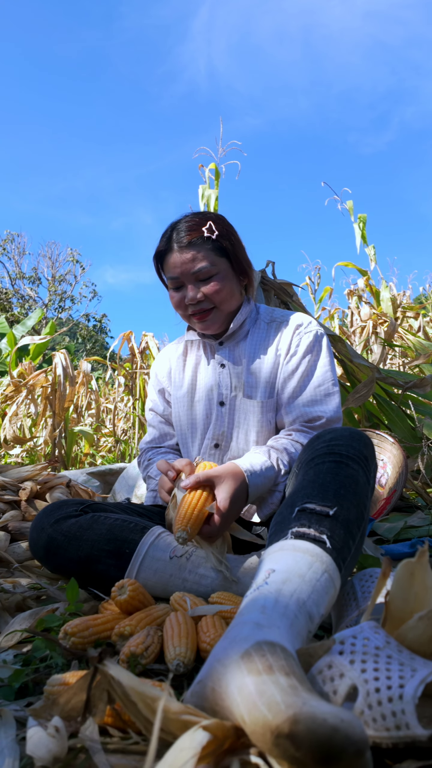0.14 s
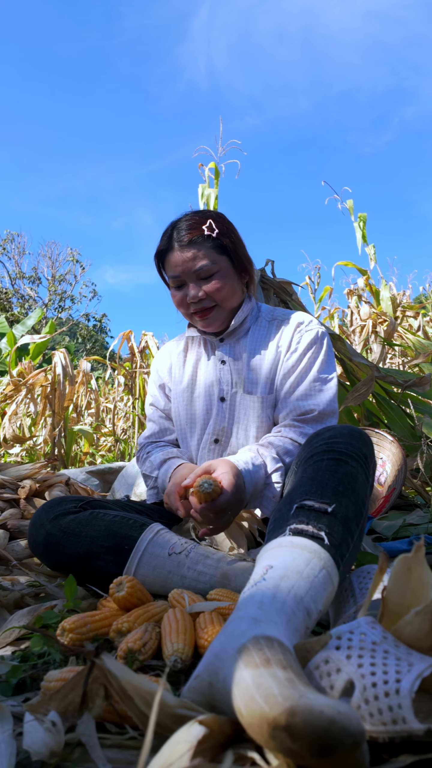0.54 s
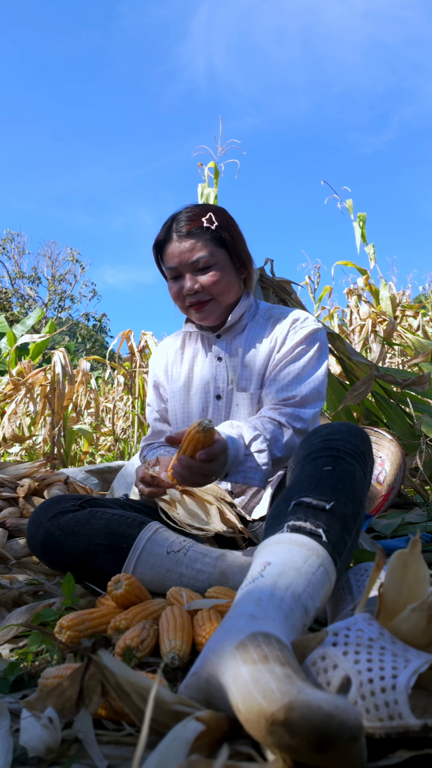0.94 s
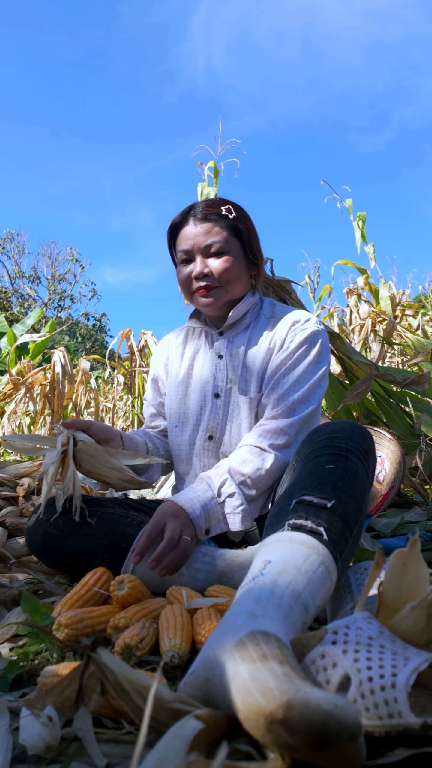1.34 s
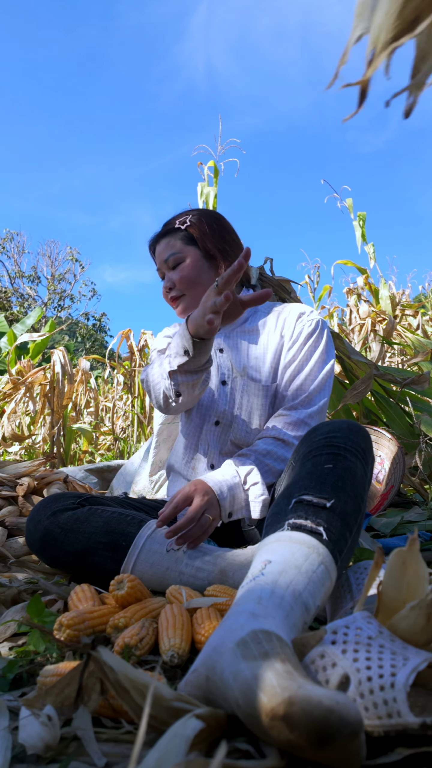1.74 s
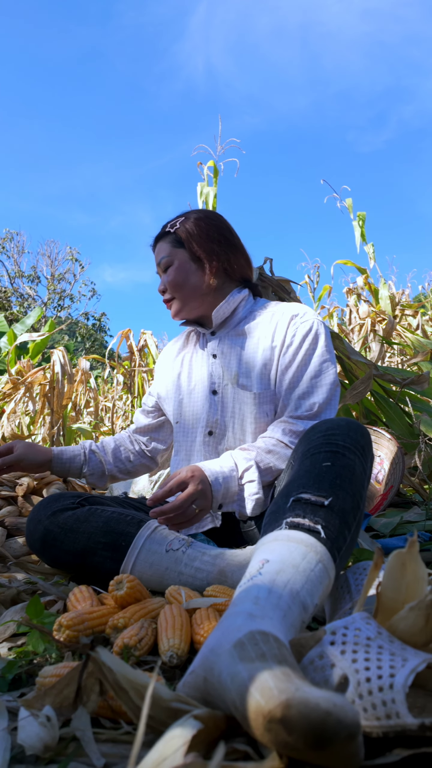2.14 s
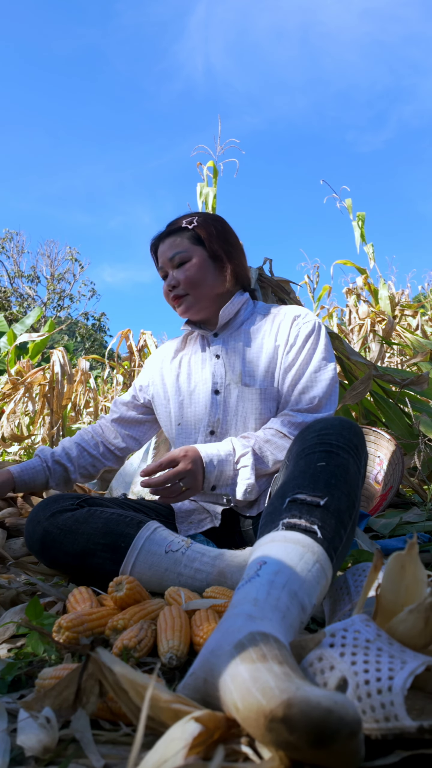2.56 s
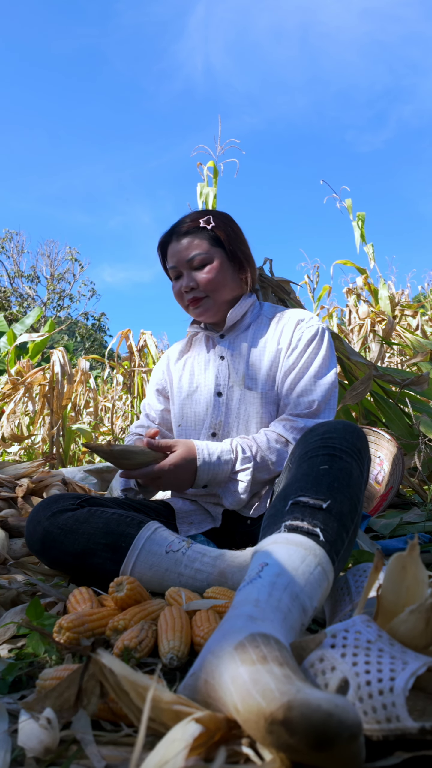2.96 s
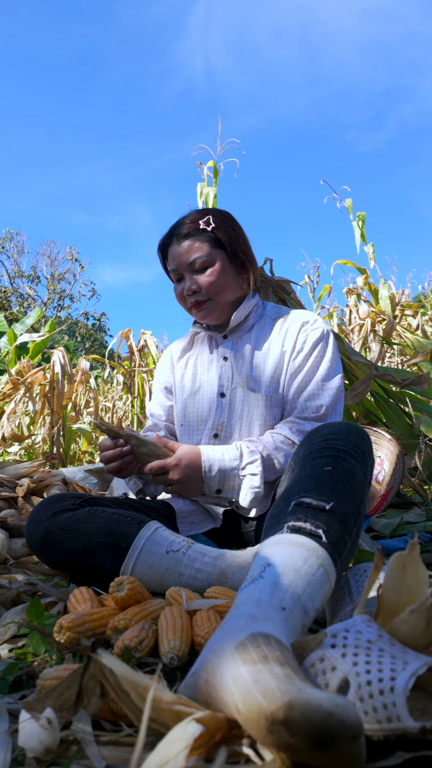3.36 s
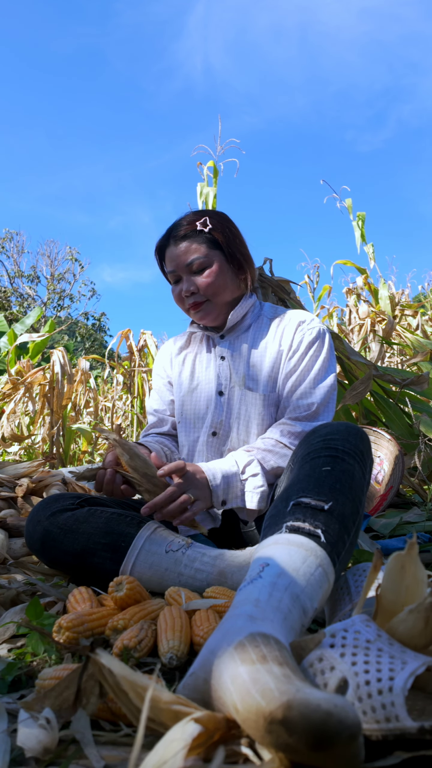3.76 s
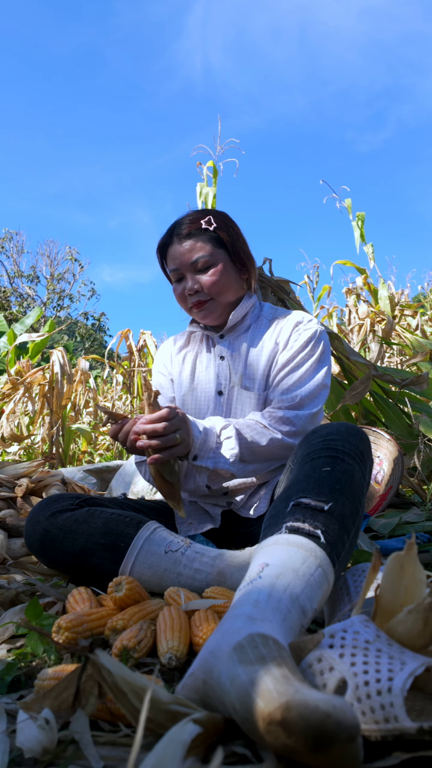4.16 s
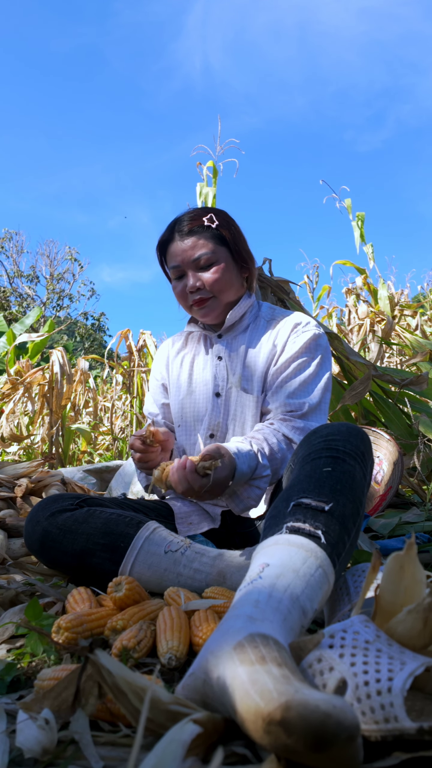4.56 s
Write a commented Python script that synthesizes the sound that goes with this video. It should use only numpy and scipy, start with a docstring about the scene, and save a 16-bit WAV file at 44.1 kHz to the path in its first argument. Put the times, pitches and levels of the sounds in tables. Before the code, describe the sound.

Outdoors in a quiet field, brittle leaves rustle and tear in uneven bursts near a pair of microphones. Soft low bumps and tiny squeaky rubs accompany the handling. A discarded husk swishes down at right around two seconds; light fumbling follows, then a hard snap and renewed ripping. A fast, regular cricket chirps faintly at right, another trills softly to the left.

```python
"""Dry husks are twisted and torn off corn ears by hand, a little left of a pair of microphones.
The leaves rustle as filtered noise driven by dense random creases; snapping fibres are resonant noise
bursts over damped modes of the ear. A husk lands on a pile at the right. Rubs, a short knock and soft
bumps throughout add wavering tones and damped sines. Behind them two crickets sing as shaped tones and
throbbing narrow-band noise, over a far low rumble and a faint hiss made of random spectra."""
import sys
import numpy as np
from scipy import signal
from scipy.fft import rfft, irfft
from scipy.io import wavfile
from scipy.ndimage import uniform_filter1d

SR = 44100
rng = np.random.default_rng(int(sys.argv[2]) if len(sys.argv) > 2 else 0)


def boost(x):
    """Linear amplitude factor 10**(x/20) for a level x in decibels (scalar or array-like)."""
    u = np.asarray(x, float) / 20
    return 10 ** u


def put_to_file(sound):
    """Save the sound as 16-bit audio at rate SR, in the file named by the first command-line argument."""
    columns = np.atleast_2d(sound).T  # one column per channel
    safe = np.clip(columns, -1, 1)
    whole_steps = np.round(safe * 32767)
    wavfile.write(sys.argv[1], SR, whole_steps.astype(np.int16))


N = 207490

# Pulls, twists and slides of the leaves: start_s, length_s, first_level_db, last_level_db,
# treble_db (relative)
PULLS = [(0, 0.13, -48.5, -55, -5.5), (0.111, 0.039, -45, -49.5, -6.5), (0.199, .015, -44, -59, -8),
         (0.302, 0.14, -49.5, -60.5, -4.5), (0.436, 0.046, -53.5, -54, -6), (0.483, .19, -52.5, -50, -4.5),
         (0.674, 0.096, -51, -52, -5), (0.808, 0.062, -51.5, -60, -9), (0.854, .113, -41, -53, -4),
         (.89, 0.047, -43.5, -47, -8.5), (.985, 0.08, -56, -60, -2.5), (1.16, 0.041, -58, -59.5, -4),
         (1.231, 0.063, -58.5, -54, -4), (1.301, 0.047, -46, -54, -5.5), (1.35, 0.073, -40.5, -56, -4),
         (1.572, 0.087, -50.5, -62.5, -9), (1.684, 0.051, -60.5, -52.5, -4.5), (1.735, 0.078, -53, -69, -5),
         (1.874, .04, -65, -69, -2), (2.022, 0.033, -35, -34.5, -4.5), (2.059, 0.041, -43, -32.5, -4.5),
         (2.097, .018, -35.5, -40, -3), (2.116, 0.046, -32, -40, -6.5), (2.161, 0.089, -42, -41, -5),
         (2.249, 0.058, -44.5, -49, -5.5), (2.31, 0.071, -50.5, -63.5, -9), (2.388, 0.075, -58.5, -50, -7),
         (2.468, .09, -51, -62.5, -3), (2.664, 0.027, -62, -57, 7.5), (2.693, 0.066, -56, -63.5, 12),
         (3.02, 0.12, -61, -71, -3.5), (3.159, 0.046, -59.5, -72, -7), (3.343, 0.04, -64.5, -68, 0),
         (3.416, .05, -59.5, -67, -1), (3.553, 0.072, -69, -66, 0), (3.603, 0.019, -51.5, -65, 3),
         (3.64, 0.023, -59, -39, -1.5), (3.666, 0.033, -23.5, -38.5, 1), (3.699, 0.053, -41, -46, -3),
         (3.756, 0.026, -48, -67, -4), (3.8, 0.138, -62.5, -54.5, -3), (3.925, 0.022, -43, -60, 1),
         (3.947, .06, -56, -71, -2), (4.045, 0.065, -56.5, -67, -4.5), (4.144, 0.025, -59, -68, -7),
         (4.167, 0.11, -63, -62, -1), (4.268, 0.041, -60.5, -45.5, -7.5), (4.304, 0.017, -39, -51, -10),
         (4.319, 0.055, -45.5, -32, -5), (4.375, 0.095, -35.5, -45, -5), (4.471, 0.047, -43, -38, -6),
         (4.516, 0.026, -38, -49.5, -0.5), (4.548, 0.035, -50.5, -71, -4), (4.669, 0.027, -70, -52, -4)]
CATCH_S, LET_GO_DB_PER_S = 0.0046, 1500  # a pull catches quickly and stops as the fingers let go
# Loose leaves stirring between pulls: time_s, level_db, body_db (relative, of cob and hand)
STIR = [(0, -58, -4.5), (.28, -58.5, -0.5), (.45, -63, -0.5), (.65, -57.5, 2), (.95, -62, 1.5),
        (1.15, -65.5, -3), (1.5, -63, -3.5), (1.95, -67, -7), (2.05, -71, -13), (2.17, -51, -0.5),
        (2.3, -59, -7), (2.6, -62, -8), (2.88, -66, -2), (3.2, -104, -5), (3.55, -65, -14),
        (3.9, -65.5, -3), (4.32, -72, -17), (4.45, -85, -11), (4.62, -76, -9.5)]
STIR_TREBLE_DB = -0.5  # relative
# Relative spectrum of the husk in the hands: frequency_hz, density_db (per Hz)
HUSK = [(150, -32), (260, -9.5), (430, 1), (530, -13.5), (660, -3.5), (850, -10), (1080, -6), (1400, -5.5),
        (2300, -2.5), (4800, 0.5), (5600, -5), (6300, -9), (10500, -4.5), (15400, -6.5), (16000, -35)]
# Relative spectrum of the tighter husk of the next ear: frequency_hz, density_db (per Hz)
FRESH_HUSK = [(150, -31), (260, -17), (430, 2.5), (530, -5), (660, 1.5), (850, -24), (1080, -27),
              (1400, -2.5), (2300, -1.5), (4800, -2), (5600, -3.5), (6300, -7.5), (10500, -4), (15400, -4),
              (16000, -38)]
FRESH_S = 2.9  # the next ear is picked up
# Relative spectrum of the loose leaves on the right: frequency_hz, density_db (per Hz)
PILE = [(150, -26), (250, 2.5), (379, -12), (637, -5.5), (917, -6.5), (1230, -1), (2030, -3.5),
        (2680, -2.5), (3080, -2), (10400, -5.5), (15500, -4), (16000, -38)]
# Left-right likeness of the rustle and snaps: frequency_hz, likeness (0-1)
LIKENESS = [(300, 0.86), (1000, 0.87), (3000, 0.57), (8000, 0.19), (15000, 0.47)]
# Place of the rustle and snaps: time_s, left_minus_right_db, left_lead_samples
PLACE = [(0, 2, 1), (1, 1.5, 1), (2.01, 5, 5), (2.02, -2.5, -4.5), (2.35, -3, -5), (2.56, 0, -2.5),
         (2.6, 4.5, 3.5), (3.6, 1.6, 2), (4.7, 1.5, 0.5)]
# Fibres that snap: start_s, level_db (relative), ring_hz, treble_db (relative), body_db (relative)
SNAPS = [(0.1201, -33.5, 3700, 3, 0), (0.1426, -38, 3950, -4, 4.5), (0.206, -50, 2220, -4, -15),
         (0.3183, -42, 2770, -12, -19), (0.341, -38.5, 2850, -12, -28), (0.4434, -37.5, 2530, -9, -19),
         (0.4949, -44, 3680, -2, -2), (0.615, -51, 3350, 5, -20), (0.752, -37.5, 4630, -3, 1),
         (0.817, -42.5, 3250, 5, -13), (0.831, -44, 4290, 4, 3), (0.8511, -24, 2670, 4, 0.5),
         (0.8549, -23, 2900, -11, -4), (0.862, -22.5, 2800, 0.5, -4), (0.9004, -43, 3520, -3, 5),
         (1.1704, -44, 3030, -12, -4), (1.266, -44, 3000, -8, -8), (1.3034, -36.5, 4900, -2, -5),
         (1.3565, -34.5, 3540, -4, -1.5), (1.3656, -28.5, 1600, -11, -18), (1.5798, -48, 3600, -10, 8),
         (2.0244, -33, 3900, -25, -6.5), (2.0364, -26.5, 1210, -14, -7.5), (2.0928, -34, 2570, -5, -12),
         (2.119, -21, 1210, 5, -22), (2.6744, -43.5, 4460, -9, -6), (3.0273, -45.5, 2290, -3, -10),
         (3.178, -54, 4900, -4, -11), (3.345, -55, 2310, -8, -22), (3.385, -53, 2290, -8, -20),
         (3.432, -56, 2300, -4, -20), (3.6076, -42.5, 1840, 8, -10), (3.6584, -21.5, 2340, -5, -24),
         (3.6681, -17.5, 2240, -6, -12.5), (3.6734, -16.5, 2030, -4, -9), (3.6754, -11, 5080, -4, -33),
         (3.6814, -26.5, 4800, -10, -16), (3.688, -26, 3010, -1, -18), (3.721, -34, 1740, 1, -9.5),
         (3.8774, -40.5, 1780, -17, -3), (3.9071, -39, 2160, -3, -1), (3.9213, -37.5, 2180, -7, -17),
         (3.9314, -34, 3800, -8, -12), (4.0372, -50.5, 2720, -13, -12), (4.146, -50, 3140, -9, -6),
         (4.3095, -30, 1620, -15, -38), (4.3236, -33.5, 1720, -5, -27.5), (4.339, -28, 1590, -12, -20),
         (4.3704, -34, 4210, -2, -14), (4.3832, -24.5, 2300, -2, -15), (4.5, -31, 2670, -5, -8),
         (4.5191, -33, 3180, -5, 0.5), (4.5357, -34, 4760, -1.5, -11)]
# Modes of the ear knocked by a snap: frequency_hz, level_db (relative), t60_s
EAR_MODES = [(409, -8, 0.094), (443, -12, 0.046), (639, -5, 0.13), (686, -0.5, 0.027)]
# Rubbed leaves that sing, and a short knock at 1.16 s:
# start_s, length_s, start_hz, end_hz, level_db (before the strength varies)
SQUEAKS = [(0.248, 0.07, 1980, 1900, -57), (0.298, 0.13, 1930, 2035, -64), (0.315, 0.059, 615, 610, -63),
           (1.163, 0.029, 688, 670, -56.5), (2.192, 0.26, 1242, 1312, -66),
           (2.583, 0.072, 2230, 2290, -67.5), (2.57, 0.14, 970, 836, -65), (2.658, 0.035, 1067, 1060, -62),
           (2.825, 0.038, 1117, 1170, -68), (3.785, 0.017, 1490, 1470, -62),
           (3.798, 0.103, 1523, 1790, -69), (3.7, 0.068, 1712, 1734, -56)]
# Soft low bumps of a hand or an ear: start_s, level_db (before decay), frequency_hz
THUDS = [(0.345, -41.5, 287), (.612, -39.5, 262), (0.753, -48, 302), (1.298, -45, 169), (1.325, -34, 143),
         (1.385, -35.5, 195), (2.22, -46.5, 201)]
FIRST_CHIRP_S, CHIRP_EVERY_S = .033, .1863  # the near cricket keeps strict time
# Trill of the far cricket: time_s, level_db (before the stereo tilt)
TRILL = [(0, -72), (1, -73), (2, -74.5), (3.1, -74), (4, -72), (4.7, -74)]
# Relative spectrum of the field at rest: frequency_hz, density_db (per Hz)
FIELD = [(25, -27), (42, -34), (62, -4), (115, 0.5), (170, -5.5), (240, -11), (310, -20), (600, -35),
         (1000, -32), (1700, -36), (5000, -41.5), (6500, -42), (10000, -42), (15400, -56), (16000, -76)]
FIELD_DB = -50  # rms
# Left-right likeness of the field: frequency_hz, likeness (0-1)
FIELD_LIKENESS = [(60, 1), (180, 0.92), (400, 0.74), (900, 0), (3000, 0), (15000, 0)]
# Swells and dips of the low rumble, used about their mean: time_s, level_db
RUMBLE = [(0.0, -51), (1.26, -52), (1.32, -46.5), (1.57, -55), (1.61, -46), (1.64, -51.5), (2.67, -49.5),
          (2.83, -53.5), (2.96, -50.5), (4.7, -51.5)]


def evened(x):
    """Normalization: scales a signal to unit rms."""
    return x / np.sqrt(np.mean(x ** 2) + 1e-20)


def read(points, hz):
    """Interpolation: reads a curve on a logarithmic frequency axis."""
    f, value = np.transpose(points)
    return np.interp(np.log(hz + 1), np.log(f + 1), value)


def add(mix, s, sound):
    """Superposition: adds a two-channel sound at time s."""
    part = mix[:, round(s * SR):][:, :sound.shape[1]]
    part += sound[:, :part.shape[1]]


def partly_alike(left, other, likeness, hz):
    """Partial coherence: the right spectrum shares part of the left and keeps its expected power."""
    same = np.clip(read(likeness, hz), 0, 1)
    return np.array([left, same * left + np.sqrt(1 - same ** 2) * other])


def rustle(per_s=2500, ticks_per_s=120):
    """Filtered shot noise: random creases in clumps shake the leaf, whose spectrum colours them."""
    control_s = np.arange(0, N / SR, .001)
    level, treble_db, body_db = handling(control_s)
    clumps = evened(uniform_filter1d(uniform_filter1d(rng.standard_normal(N), 300), 300))
    crease_db = 2.0 * np.minimum(rng.exponential(1, N), 4)
    size = boost(crease_db) * (rng.random(N) < per_s / SR)
    puffs = signal.lfilter([1], [1, -np.exp(-1 / 103.0)], size)  # decay constant in samples
    # stiff veins crack with a shorter decay
    cracks = rng.exponential(1, N) * (rng.random(N) < ticks_per_s / SR)
    ticks = signal.lfilter([1], [1, -np.exp(-1 / 45.0)], cracks)
    envelope = (1.0 + evened(puffs) + 0.38 * evened(ticks)) * boost(-clumps)
    shake = envelope * rng.standard_normal((2, N))
    shake[0] = evened(evened(shake[0]) + 0.51 * creases(size))
    shake /= shake.std(1)[:, None]
    hz, t, (left, other) = signal.stft(shake, SR, nperseg=512, noverlap=384)
    hz = hz[:, None]
    both = partly_alike(left, other, LIKENESS, hz)
    # small time-frequency patches make the colour uneven
    patches = uniform_filter1d(rng.standard_normal(left.shape), 3, 0)
    patches = evened(uniform_filter1d(patches, 10, 1))
    treble_db, body_db = np.interp(t, control_s, treble_db), np.interp(t, control_s, body_db)
    colour = boost(husk_db(t, hz, treble_db, body_db) + 1.8 * patches)
    spectra = both * colour * sides(t, hz)
    leaves = signal.istft(spectra, SR, nperseg=512, noverlap=384)[1][:, :N]
    return np.interp(np.arange(N) / SR, control_s, level) * evened(leaves)


def handling(t):
    """Power summation: pulls add to the stirring, and treble is weighted by their power."""
    start, length, first_db, last_db, treble_db = np.transpose(PULLS)[:, :, None]
    since = t - start
    db = first_db + (last_db - first_db) * np.clip(since / length, 0, 1)
    db = db - LET_GO_DB_PER_S * np.clip(since - length, 0, 1)
    power = (boost(db) * np.clip(since / CATCH_S, 0, 1)) ** 2
    s, stir_db, body_db = np.transpose(STIR)
    stir = boost(np.interp(t, s, stir_db)) ** 2
    total = power.sum(0) + stir
    treble = ((power * treble_db).sum(0) + stir * STIR_TREBLE_DB) / total
    return np.sqrt(total), treble, np.interp(t, s, body_db)


def creases(size):
    """Damped resonance: about a quarter of the creases free a scrap ringing at one of 40 pitches."""
    t, out = np.arange(900) / SR, np.zeros(N)
    scrap = rng.integers(0, 160, N)
    for k, hz in enumerate(np.geomspace(350, 14000, num=40)):
        decay = np.exp(-t / 0.013 * (1 + (hz / 6000) ** 2))  # high pitches die sooner
        ring = decay * np.sin(2 * np.pi * hz * rng.uniform(0.92, 1.04) * t) * np.sqrt(hz)
        out += signal.oaconvolve(size * (scrap == k), ring)[:N]
    return evened(out)


def husk_db(s, hz, treble_db, body_db):
    """Spectral envelope: blends hands and pile by place, then shifts the treble and low body."""
    when, _, lead = np.transpose(PLACE)
    in_hands = np.clip(np.interp(s, when, lead), 0, 1)
    held = np.where(s < FRESH_S, read(HUSK, hz), read(FRESH_HUSK, hz))
    leaf = in_hands * held + (1 - in_hands) * read(PILE, hz)
    high = np.clip((hz - 5400) / 1200, 0, 1)
    low = np.clip((950 - hz) / 200, 0, 1)
    return leaf + high * (treble_db + 3.5) + low * (body_db + 7.5)


def sides(s, hz):
    """Level and phase difference between microphones; the housing adds a turn near 800 Hz."""
    when, pan_db, lead = np.transpose(PLACE)
    pan_db, lead = np.interp(s, when, pan_db), np.interp(s, when, lead)
    housing = 1.3 * np.tanh(lead) * np.exp(-(np.log(hz / 800 + 1e-6) / .45) ** 2)
    turn = 2 * np.pi * hz * lead / SR + housing
    half = boost(pan_db / 2) * np.exp(.5j * turn)
    return np.array([half, 1 / half])


def snap(s, db, ring_hz, treble_db, body_db, noise):
    """Impulsive excitation: a fizzing crack rings the freed strip and knocks modes of the ear."""
    t, hz = np.arange(noise.shape[1]) / SR, np.fft.rfftfreq(4096, 1 / SR)
    decay = np.exp(-t / .0007) + boost(-13) * np.exp(-t / .0055)  # crack, then weaker tail
    crack = decay * noise + 3 * (t == 0)
    left, other = rfft(crack, 4096)
    both = partly_alike(left, other, LIKENESS, hz)
    strip = 1 + 2 / (1 + ((hz - ring_hz) / (0.088 * ring_hz)) ** 2)
    log_gain = np.log(boost(husk_db(s, hz, treble_db, body_db)) * strip + 1e-4)
    # minimum phase, so that the colour follows the crack
    phase = -signal.hilbert(np.r_[log_gain, log_gain[-2:0:-1]]).imag[:len(hz)]
    later = np.exp(-2j * np.pi * hz * 8 / SR)  # delay of 8 samples
    sound = irfft(both * np.exp(log_gain + 1j * phase) * sides(s, hz) * later)
    t = np.arange(4096) / SR
    knock = sum(boost(mode_db - 60 * t / t60) * np.sin(2 * np.pi * f * t) for f, mode_db, t60 in EAR_MODES)
    return boost(db) * (1.61 * sound / abs(sound).max() + boost(body_db - 18.5) * knock)


def note(hz, db):
    """Phase integration: a soft-edged tone follows a pitch curve."""
    tone = np.sin(2 * np.pi * np.cumsum(hz) / SR)
    return boost(db) * tone * signal.windows.tukey(len(hz), .6) * np.ones((2, 1))


def squeaks():
    """Tonal vibration: rubbed leaves and one short knock sound, wavering in pitch and strength."""
    out = np.zeros((2, N))
    for s, length, start_hz, end_hz, db in SQUEAKS:
        wander = evened(uniform_filter1d(rng.standard_normal((2, 14000)), 120))
        waver, strength = wander[:, :round(length * SR)]
        pitch_hz = np.linspace(start_hz, end_hz, len(waver)) * (1 + 0.017 * waver)
        add(out, s, note(pitch_hz, db) * (1 + 0.68 * strength))
    return out


def thuds():
    """Damped oscillation: a soft low push dies in a few cycles."""
    out, t = np.zeros((2, N)), np.arange(2500) / SR
    for s, db, hz in THUDS:
        push = np.sin(2 * np.pi * hz * t) * np.exp(-hz * t / 1.66)
        add(out, s, boost(db) * push * np.ones((2, 1)))
    return out


def near_cricket(chirp_db=-63, note_s=0.024, gap_s=.043, chirp_hz=8350):
    """Pulsed tones: on the right, two notes and a faint third sag in pitch at their ends."""
    out, u = np.zeros((2, N)), np.linspace(0, 1, round(note_s * SR))
    pitch_hz = chirp_hz * (1 - 0.013 * u ** 4)
    for s in np.arange(FIRST_CHIRP_S, N / SR, CHIRP_EVERY_S):
        for later, weaker_db in ((0, 0), (gap_s, 0), (2 * gap_s - note_s / 2, -9)):
            # each note is roughened by random level changes
            uneven_db = 3.5 * evened(uniform_filter1d(rng.standard_normal((2, len(u))), 200))
            side_db = np.array([[-1.5], [1.5]])
            add(out, s + later, note(pitch_hz, chirp_db + weaker_db) * boost(side_db + uneven_db))
    return out


def far_cricket(trill_hz=4750, strokes_per_s=38):
    """Amplitude modulation: a narrow noise band throbs at a drifting rate, slightly to the left."""
    t = np.arange(N) / SR
    drift = evened(uniform_filter1d(rng.standard_normal(N), 4000))
    throb = 1.3 + np.cos(np.pi * np.cumsum(strokes_per_s * (1 + 0.04 * drift)) / SR) ** 2
    fuzz = uniform_filter1d(uniform_filter1d(rng.standard_normal((2, 2, N)), 130), 130)
    angle = 2 * np.pi * trill_hz * t
    trill = throb * (fuzz[0] * np.cos(angle) + fuzz[1] * np.sin(angle))
    level = boost(np.interp(t, *np.transpose(TRILL)))
    return level * evened(trill) * boost(np.array([[1.5], [-1.5]]))


def field():
    """Spectral synthesis: random spectra form rumble and hiss with slow patches and low swells."""
    frames, hz = N // 512 + 5, np.fft.rfftfreq(2048, 1 / SR)[:, None]
    a, b, c, d, patches = rng.standard_normal((frames, 1025, 5)).T
    patches = evened(uniform_filter1d(uniform_filter1d(patches, 20, 0), 6, 1))
    both = partly_alike(a + 1j * b, c + 1j * d, FIELD_LIKENESS, hz)
    s, db = np.transpose(RUMBLE)
    swell_db = np.interp((np.arange(frames) - 2) * 512 / SR, s, db - db.mean())
    swell_db = swell_db / (1 + (hz / 300) ** 4)  # fades out above the rumble
    both *= boost(read(FIELD, hz) + 1.45 * patches + swell_db)
    air = signal.istft(both, nperseg=2048, noverlap=1536)[1][:, :N]
    return boost(FIELD_DB) * evened(air)


def scene():
    """Superposition: husks sound over the crickets and the field."""
    mix = rustle()
    for row, noise in zip(SNAPS, rng.standard_normal((len(SNAPS), 2, 1200))):
        add(mix, row[0], snap(*row, noise))
    return mix + squeaks() + thuds() + near_cricket() + far_cricket() + field()


def top_cut(x):
    """Nothing passes above the cut-off."""
    return signal.sosfilt(signal.butter(12, 16640, fs=SR, output="sos"), x)


def record(dry):
    """High-pass filtering: the microphones cut the deep bass below about 56 Hz."""
    high_pass = signal.butter(4, 56, "high", fs=SR, output="sos")
    mix = signal.sosfilt(high_pass, dry)
    return top_cut(mix)


dry = scene()
out = record(dry)
put_to_file(out)
```